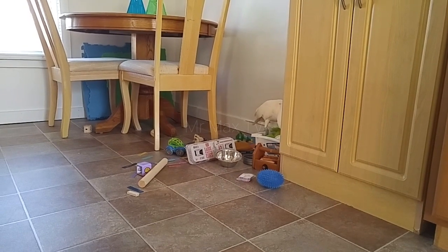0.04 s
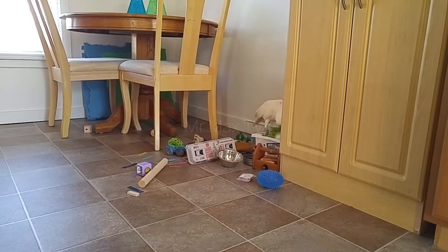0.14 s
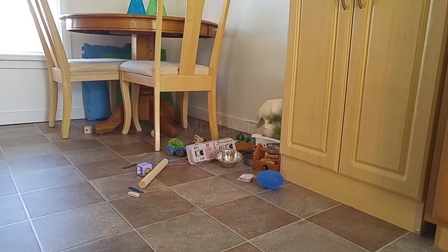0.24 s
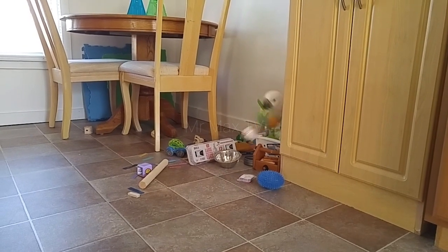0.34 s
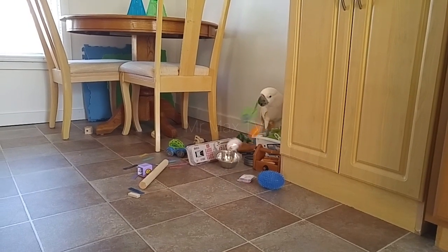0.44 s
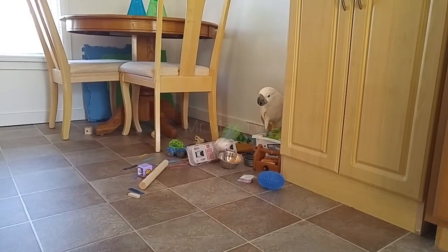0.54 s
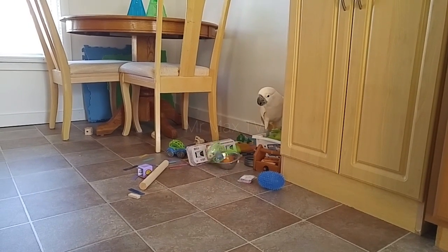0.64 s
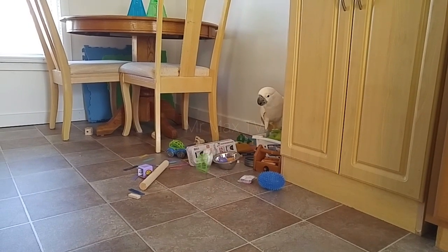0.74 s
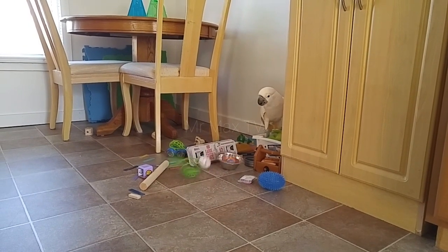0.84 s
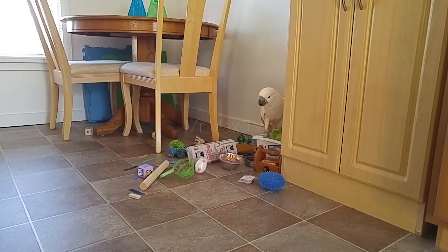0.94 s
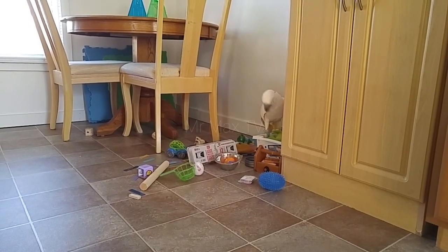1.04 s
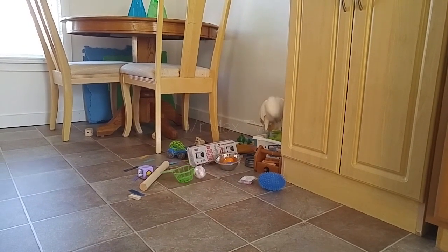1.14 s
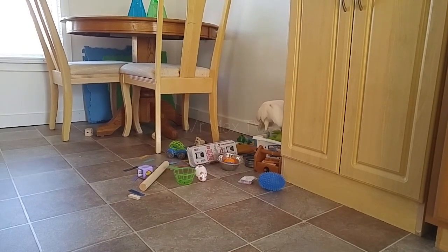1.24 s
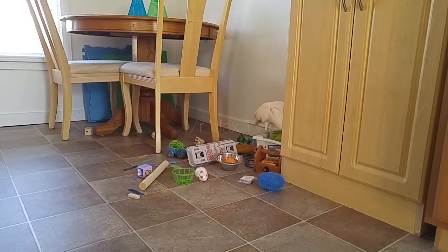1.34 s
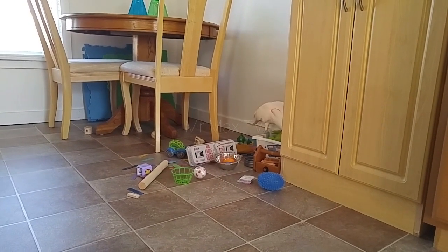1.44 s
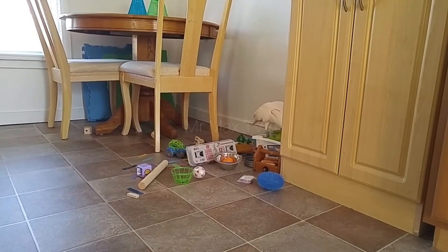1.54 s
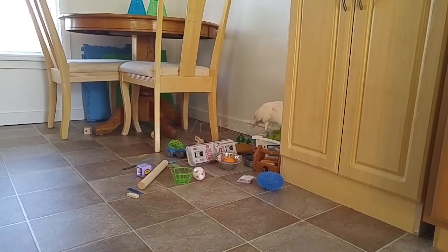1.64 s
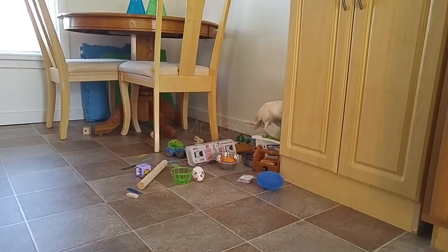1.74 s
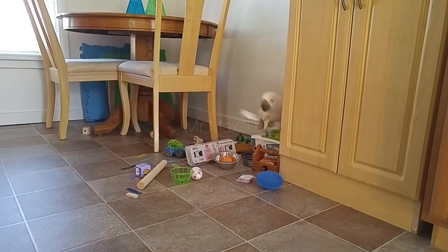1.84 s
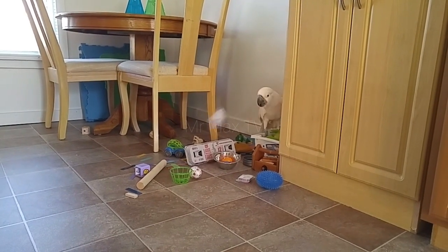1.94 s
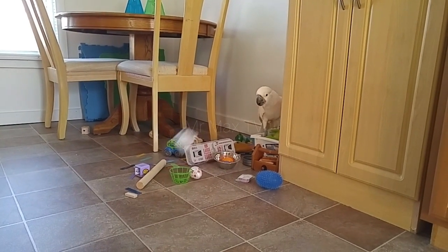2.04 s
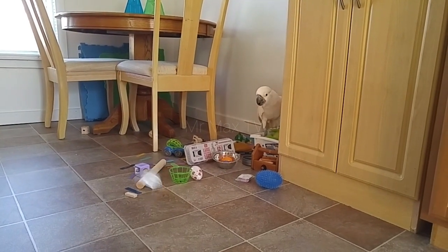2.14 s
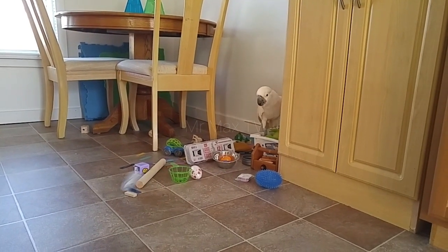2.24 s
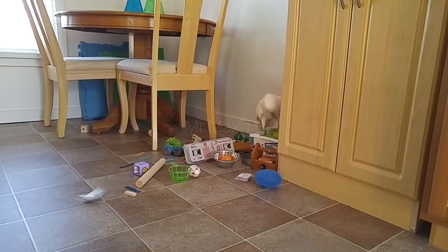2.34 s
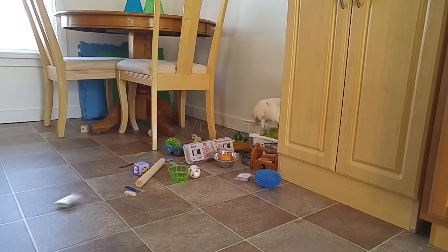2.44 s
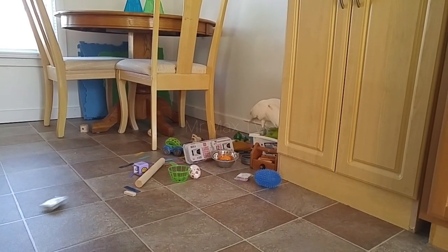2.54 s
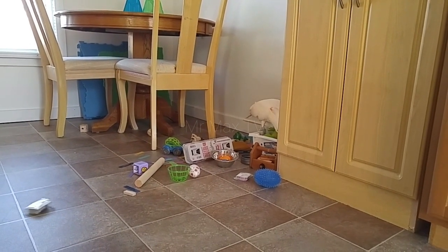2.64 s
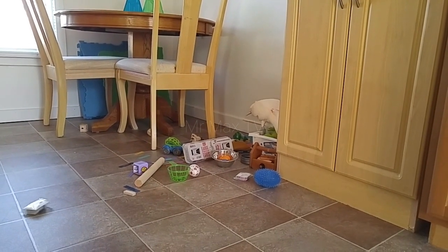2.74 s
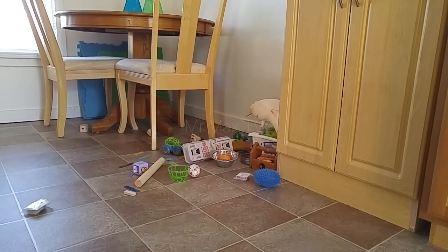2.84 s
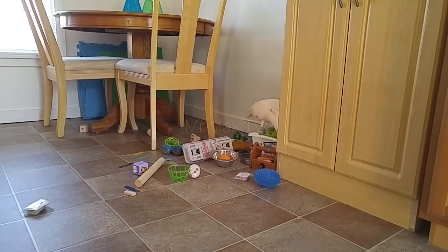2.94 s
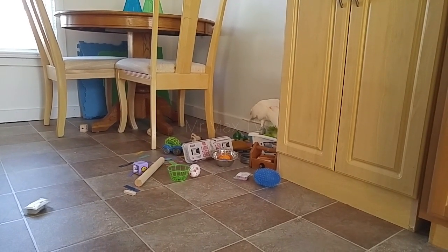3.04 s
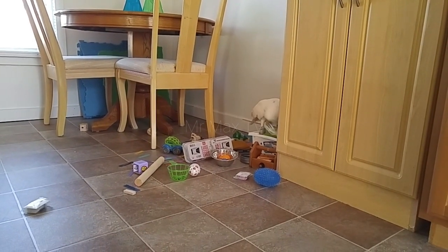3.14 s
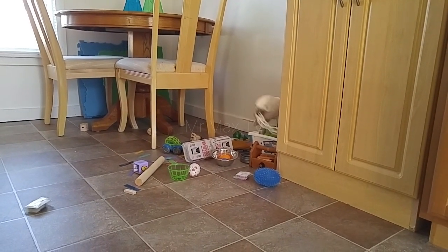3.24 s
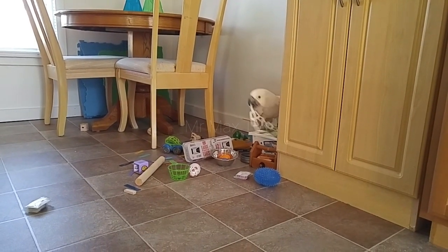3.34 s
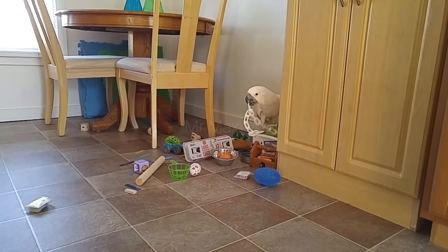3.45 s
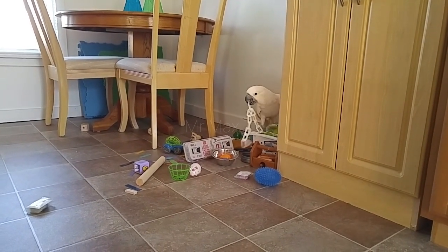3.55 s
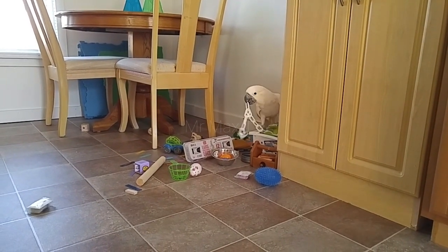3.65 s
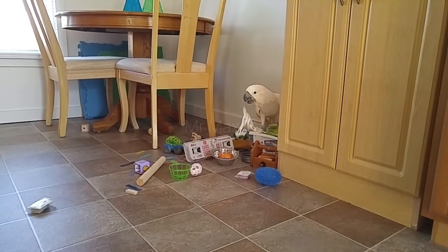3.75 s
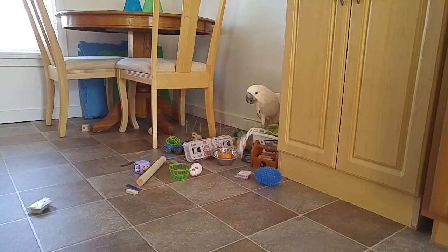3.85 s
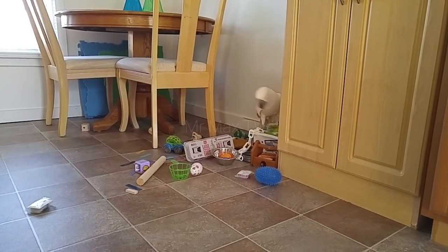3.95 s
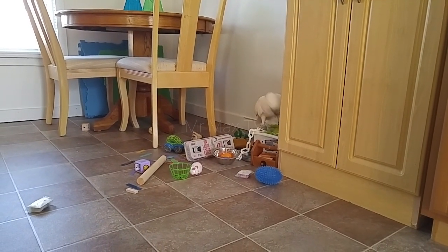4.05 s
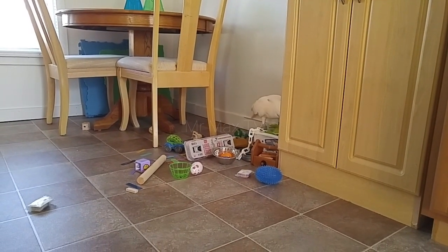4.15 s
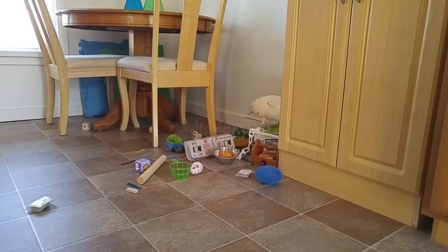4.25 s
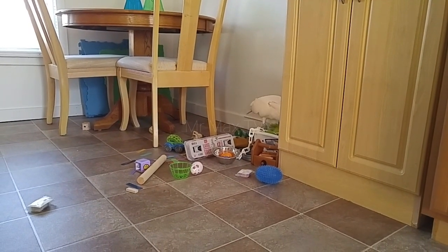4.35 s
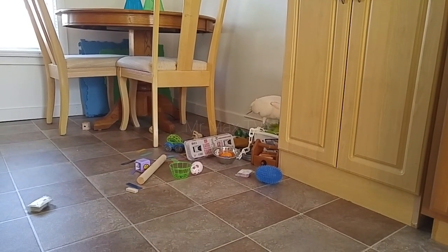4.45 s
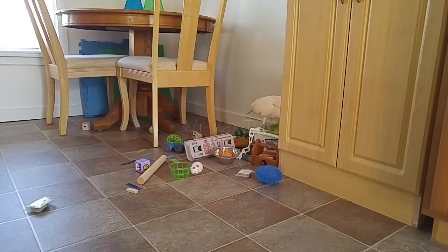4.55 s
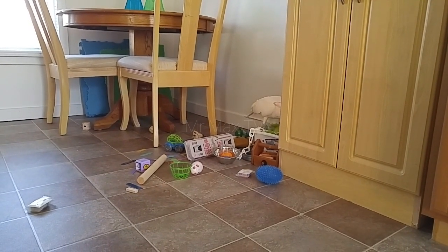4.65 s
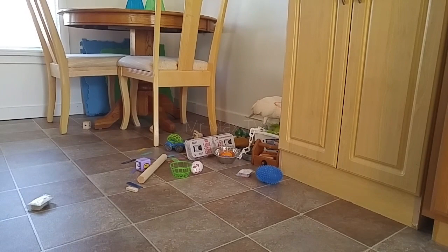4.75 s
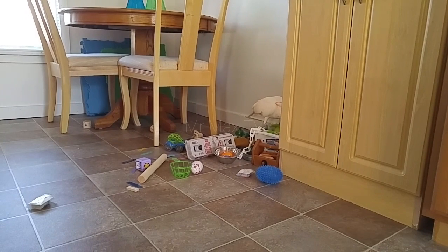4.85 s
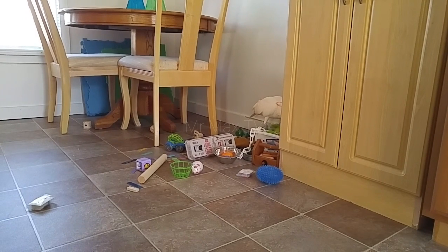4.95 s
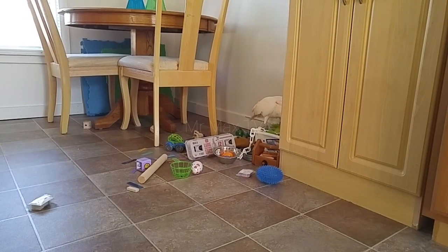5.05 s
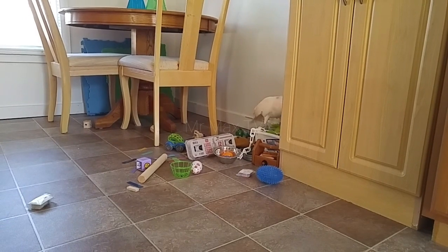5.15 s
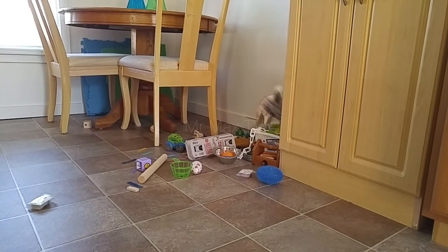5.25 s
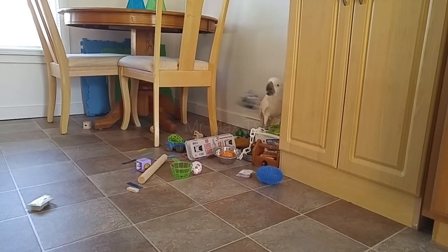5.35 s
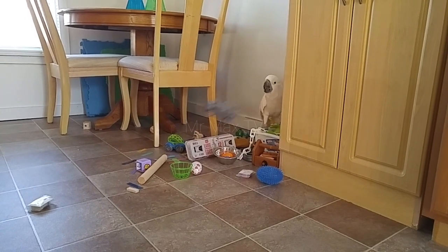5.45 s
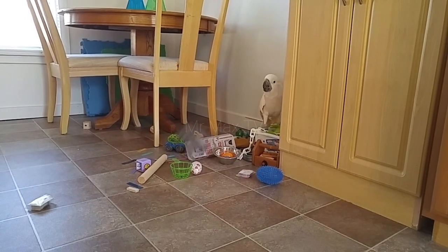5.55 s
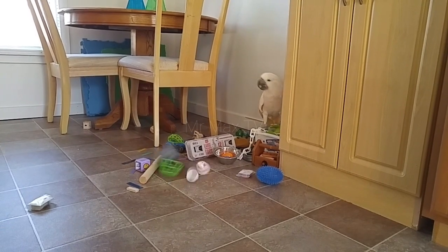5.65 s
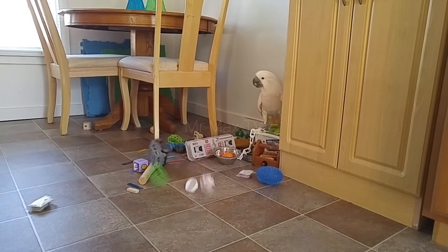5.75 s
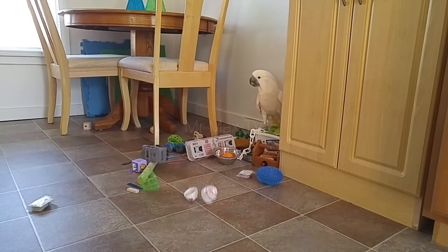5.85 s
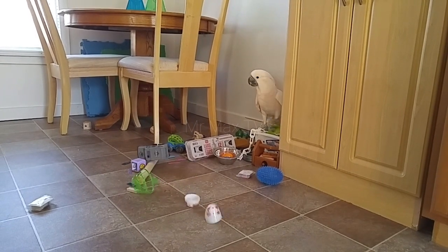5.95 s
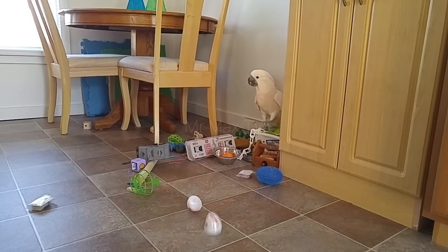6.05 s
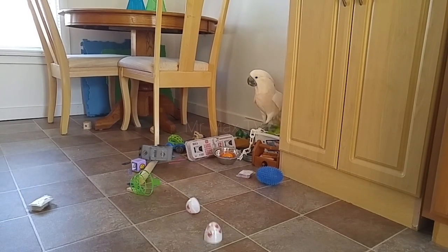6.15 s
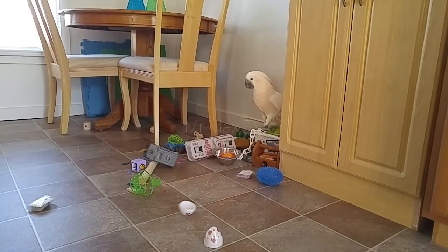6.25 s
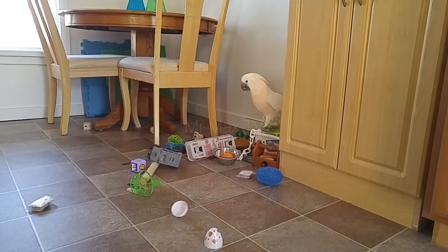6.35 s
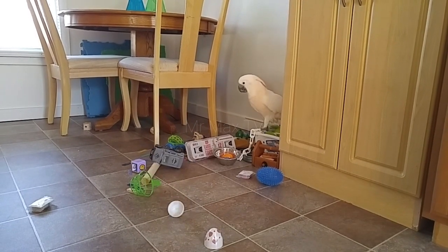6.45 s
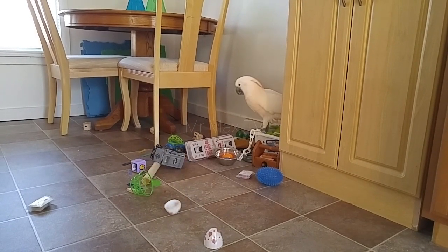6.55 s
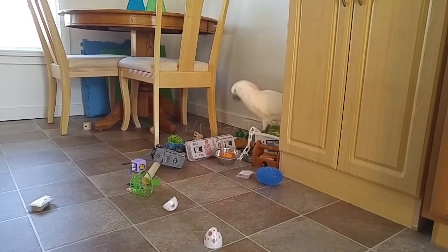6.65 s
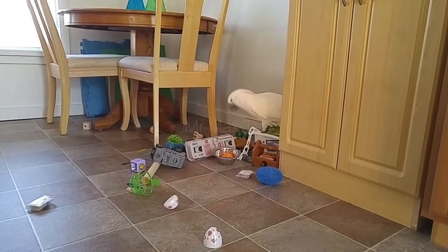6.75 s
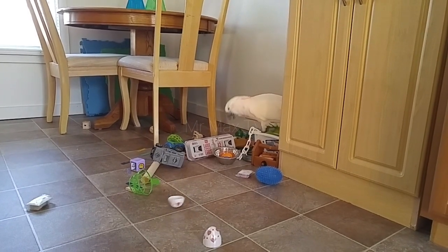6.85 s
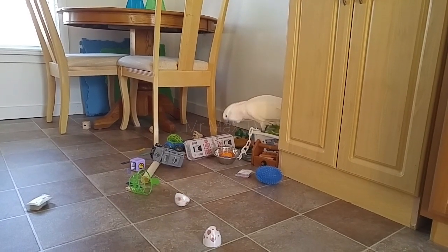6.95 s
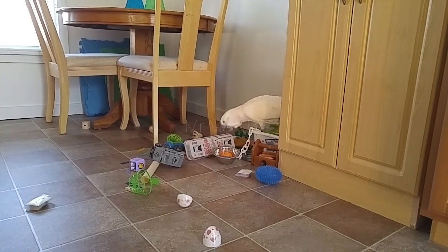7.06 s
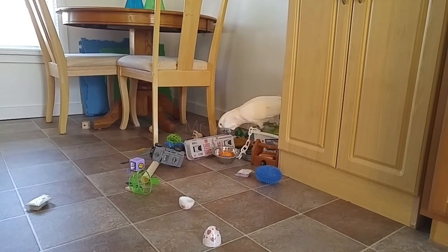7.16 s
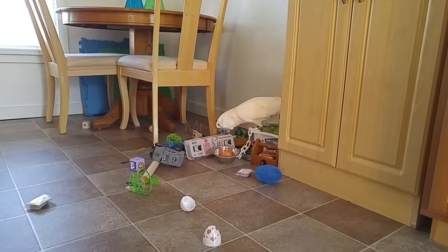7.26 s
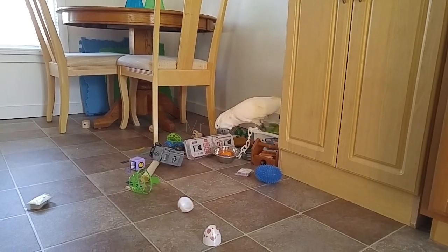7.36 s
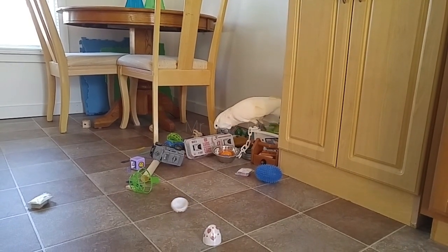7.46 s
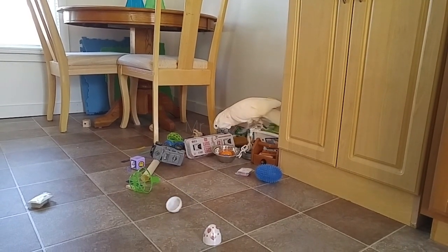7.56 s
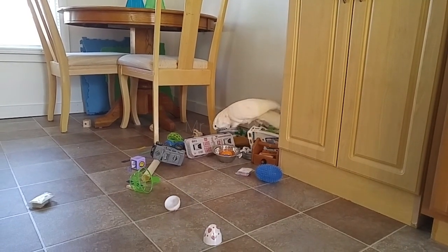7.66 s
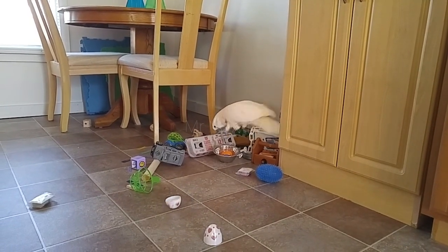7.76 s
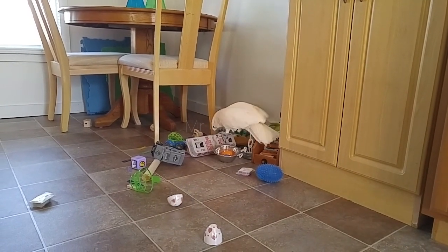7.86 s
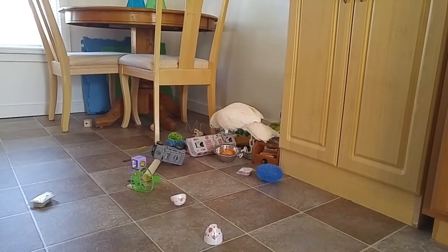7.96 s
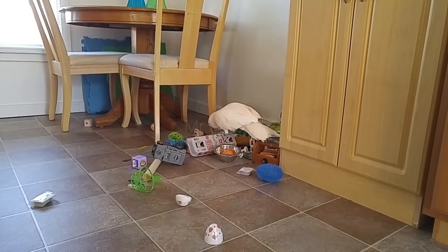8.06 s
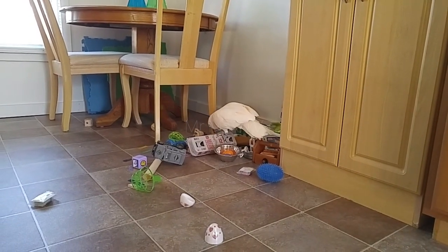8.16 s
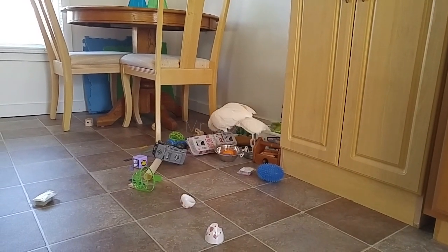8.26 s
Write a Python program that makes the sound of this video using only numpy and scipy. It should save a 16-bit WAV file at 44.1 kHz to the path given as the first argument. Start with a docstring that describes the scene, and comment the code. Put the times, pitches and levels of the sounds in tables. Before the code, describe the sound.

Plastic toys clatter, bounce and scrape on a tiled kitchen floor in bursts, with a ringing steel bowl and a jingling chain.

```python
"""Plastic toys knock, bounce and scrape on a tiled kitchen floor; a steel bowl and a chain ring out.
A pet bird is rummaging in the heap and flinging them about. Each hit makes a click and sets the
toy ringing, briefly for plastic and longer for steel. The hard room echoes and an appliance hums.
Two microphone openings, left and right, hear the bass alike and the treble differently."""
import sys
import numpy as np
from scipy import signal
from scipy.fft import rfft, irfft, next_fast_len
from scipy.io import wavfile
from scipy.ndimage import map_coordinates

SR = 44100
rng = np.random.default_rng(int(sys.argv[2]) if len(sys.argv) > 2 else 0)


def inscribe(sig):
    """Save sig as 16-bit PCM at rate SR to the path in sys.argv[1].

    A 1-D sig is mono; a 2-D sig holds one channel per row.
    Samples are clipped to [-1, 1] before scaling.
    """
    pcm = np.round(np.clip(np.atleast_2d(sig).T, -1, 1) * 32767)
    wavfile.write(sys.argv[1], SR, pcm.astype(np.int16))


N = 366030


def knocks():
    """Each hit clicks, rings the toy's hollow shell and thuds the floor. Rows: to the room, direct."""
    # t/s, click level/dB, shell f/Hz, shell over click/dB, thud over click/dB, direct path gain/dB
    hits = [(0.2248, -37, 700, 4.5, -4, -19), (0.2723, -29, 1070, -6, -13, 1),
            (0.2892, -23.5, 707, -1, -12, -4), (0.411, -23, 760, 1, -22, -14),
            (0.4324, -24, 1090, 6, -25, 4), (0.4467, -13, 2330, 4.5, -40, -5),
            (0.4693, -9.5, 1050, -27, -42, -0.5), (0.5309, -7.5, 2510, -15, -9, 3.5),
            (0.6005, -27, 854, 8, 11.5, -3), (0.6794, -10.5, 872, -16, -34, 7),
            (0.7289, -10, 2540, -11.5, -13, -14), (0.764, -21, 2250, 2, -14, -3),
            (0.8063, -26, 2170, 6, 8.5, -8), (0.8854, -22, 870, 2, -20, 2.5),
            (1.0029, -10.5, 1340, -12, -21, -1), (1.1508, -24, 1100, -5.5, -14, -12),
            (1.3425, -29.5, 1400, -24, -9, 3), (1.6175, -38, 1410, -11, -15, 0),
            (1.786, -26.5, 1420, -12, -10, -12), (1.9267, -31.5, 630, -29, -19, 10.5),
            (2.034, -36.5, 1940, -40, -21, -7), (2.226, -24.5, 654, -13, -32, -2),
            (2.2467, -10, 890, -3.5, -39, -17), (2.2548, -9.5, 683, 2.5, -28, -3),
            (2.2742, -28.5, 1390, 11, -29, 4), (2.4537, -6, 1310, -8, -44, 3),
            (2.4658, -26, 740, -2, -34, 12), (2.5681, -21.5, 1150, -1.5, -7.5, 3.5),
            (3.1212, -29.5, 750, 1.5, -13, -15), (3.1634, -20.5, 890, -5, -26, -4),
            (3.1803, -10.5, 1880, -11, -32, -3), (3.3829, -6, 765, -5, -46, -0.5),
            (3.404, -17, 1760, 2, -25, 5.5), (3.487, -22, 1950, 1, -28, 7),
            (3.5166, -15.5, 690, -5, -17, 3.5), (3.7214, -32, 738, -26, -13, -13),
            (3.8356, -20.5, 645, -9, -38, 3.5), (3.95, -2.5, 1463, -15, -48, -0.5),
            (3.966, -12.5, 1600, -2, -29.5, 9.5), (3.9832, -7.5, 602, -5, -45, -2),
            (4.406, -44, 1110, 5, 2, -14), (4.572, -40, 790, 5, -10, -11), (4.617, -32, 1100, 1, -11, -3),
            (4.7258, -41.5, 1177, 9, -1, -10.5), (4.9565, -42, 1120, 13.5, 6, -10),
            (5.0895, -41.5, 680, 8, -2, -14), (5.2281, -33, 1110, -2, -9, -8),
            (5.4004, -51, 2130, 8.5, -20, -4), (5.6649, -7.5, 1100, 3.5, -31, -1.5),
            (5.696, -0.5, 1880, -10.5, -9.5, -3), (5.713, -12, 1960, -15, -29, 4),
            (5.7784, -10.5, 1420, 2, -1, 4), (5.7988, -20, 1000, 0, -26, 10), (5.9, -29, 625, -4, 10, 1),
            (6.3286, -16, 1060, 3, -3.5, -14.5), (6.4202, -20.5, 1740, 1, -11, 0),
            (6.677, -35, 3530, -1, -30, 2), (6.6857, -25, 1940, -2.5, -10, -7),
            (6.7297, -23.5, 790, -14, -29, 2.5), (6.99, -36.5, 2090, -9, -22, 0),
            (7.196, -41, 670, 14.5, 4, 3.5), (7.257, -36.5, 640, -1, -5, -11),
            (7.432, -21, 770, -11, -26, 0.5), (7.475, -5, 1900, -17.5, -49, -1.5),
            (7.492, -13, 2000, -13.5, -35, 5.5), (7.6153, -22.5, 2140, -3, -11, -5),
            (7.723, -19, 730, -10, -18, -2)]
    # a shell's tones: ratio to its pitch, level/dB
    shell_tones = [(.62, -10), (1, 4.5), (1.45, -2), (2.1, -15)]
    # the colour of hard plastic on tile: f/Hz, level/dB
    click_colour = [(1180, -13.5), (2000, -4.5), (3460, -10.5), (4090, -9.5), (5470, -12), (6360, -6),
                    (8820, -4), (10100, -12), (14700, -23.5), (16100, -36), (16500, -50)]
    clicks, bodies, t = np.zeros((2, N)), np.zeros((2, N)), np.arange(SR // 10) / SR
    for s, db, hz, shell_db, thud_db, near_db in hits:
        click = amp(db - 60 * t / 0.015) * rng.choice([-1, 1], len(t)) * (1 - np.exp(-t / 0.00058))
        # higher tones die sooner
        shell = sum(amp(level_db - 60 * t * ratio / 0.018) * np.sin(2 * np.pi * hz * ratio * t)
                    for ratio, level_db in shell_tones)
        shell *= 1 - np.exp(-t / 0.00036)
        thud = sum(np.sin(2 * np.pi * low_hz * rng.uniform(6 / 7, 7 / 6) * t)
                   for low_hz in (140, 260, 400))
        thud *= amp(-60 * t / 0.048) * (1 - np.exp(-t / 0.005))
        body = amp(db + shell_db) * shell + amp(db + thud_db) * thud
        for path, gain in enumerate([1, amp(near_db)]):
            add(clicks[path], s, gain * click)
            add(bodies[path], s, gain * body)
    return coloured(clicks, click_colour) + bodies


def rummage():
    """Each shove swells and fades as the toys scrape, rattle their shells and rumble on the tiles."""
    # peak t/s, rustle level/dB, 20 dB swell/s, 20 dB fade/s, rattle and rumble over rustle/dB
    shoves = [(.3, -47, 0.14, 0.18, 6.5, -10), (0.479, -22.5, 0.11, 0.083, -1.5, -17),
              (.6, -36, .1, 0.34, 7, 6.5), (.69, -27, 0.047, .06, -2, 1.5),
              (.74, -21.5, 0.06, 0.1, -1, -2.5), (.89, -38, 0.48, 0.32, 6, -3.5),
              (1.02, -30, .08, 0.07, -7.5, -8.5), (1.23, -41.5, 0.23, 0.075, -4.5, -21),
              (1.42, -51, 0.5, 0.22, -0.5, -2.5), (1.64, -44.5, 0.018, 0.22, -5.5, -11),
              (1.83, -39.5, 0.11, 0.072, -5, -8), (1.94, -45.5, 0.27, 0.038, -11, -19),
              (2.26, -47.5, 0.044, 0.072, -3, -20), (2.33, -47, 0.087, 0.068, 5, 5.5),
              (2.468, -39.5, 0.022, 0.089, 11, -17), (2.589, -48, 0.19, 0.15, 1.5, -0.5),
              (3.07, -49.5, 0.37, 0.25, 2, -10), (3.19, -35.5, 0.069, 0.55, -5.5, -13),
              (3.33, -47, 0.22, .1, -6, -3), (3.393, -35, 0.029, 0.11, 13.5, -21),
              (3.49, -29.5, .07, 0.14, -2, -11), (3.88, -34.5, 0.12, 0.21, -0.5, -28),
              (3.969, -26.5, 0.028, 0.1, -2, -7), (4.09, -33.5, 0.091, 0.1, -3.5, -10),
              (4.62, -55.5, 0.15, 0.24, 5, 8.5), (4.74, -61, .04, 0.18, 10.5, 13.5),
              (4.97, -62.5, 0.043, 0.12, 13.5, 7), (5.1, -59, 0.037, 0.15, 17, 4),
              (5.25, -52.5, 0.14, 0.1, 5, 1), (5.708, -26, 0.023, 0.092, 3, -3),
              (5.8, -34.5, 0.086, 0.13, 5, 9.5), (5.89, -37, 0.086, 0.15, 6.5, -16),
              (6.059, -47, 0.12, 0.046, 15, -12), (6.17, -51, 0.052, 0.09, 19, -14),
              (6.332, -40, 0.055, 0.19, 9.5, -21), (6.45, -47.5, 0.19, 0.047, 4, 7),
              (6.7, -41, 0.027, 0.16, 0.5, -9), (6.82, -46.5, 0.18, 0.05, -1, -10),
              (7.01, -63, 0.074, .24, 4, -12), (7.21, -61.5, 0.071, 0.56, 12, 16),
              (7.488, -31.5, 0.055, 0.083, 0.5, -16), (7.63, -40, .03, 0.35, 1.5, -8),
              (7.871, -42.5, 0.078, 0.087, 14, 9)]
    # the heap never lies quite still: level/dB of rustle, rattle, rumble
    stir_db = (-72.5, -69, -59.5)
    # the colours of scraping, rattling and rumbling toys: f/Hz, level/dB
    rustle_colour = [(1180, -22), (2000, -13), (2580, -4.5), (3740, -1.5), (5010, -5.5), (6140, -2),
                     (9460, 0.5), (10700, -10), (14700, -14), (16100, -35), (16500, -42)]
    rattle_colour = [(240, -10), (400, -7), (525, -4.5), (715, 8.5), (1680, 0), (1820, 1.5), (2480, -4.5),
                     (3500, -11), (4550, -21), (7700, -120)]
    rumble_colour = [(41, -47), (70, -16), (125, -11.5), (214, -6.5), (423, 0), (469, -15.5), (650, -4.5),
                     (840, -16.5), (1430, -120)]
    t = np.arange(N) / SR
    power = np.ones((3, N)) * amp(stir_db)[:, None] ** 2
    for s, db, swell_s, fade_s, rattle_db, rumble_db in shoves:
        shape_db = db - 20 * np.where(t < s, (s - t) / swell_s, (t - s) / fade_s)
        power += amp([[0], [rattle_db], [rumble_db]]) ** 2 * amp(shape_db) ** 2
    rustle = coloured(ticks(1800, spread_db=5.0), rustle_colour)
    rattle = coloured(ticks(700, spread_db=4.0), rattle_colour)
    rumble = coloured(ticks(250, spread_db=5.5), rumble_colour)
    return np.sum(np.sqrt(power) * [rustle, rattle, rumble], axis=0)


def plastic_cups():
    """Thin cups and toy egg halves rock and bounce: the rim taps and the hollow inside rings."""
    # t/s, level/dB, f/Hz of the hollow, tap over ring/dB
    bounces = [(4.637, -24.5, 1095, -18), (4.669, -28, 1030, -22), (4.974, -24.5, 1084, -31),
               (5.019, -31.5, 1050, -23), (5.869, -10.5, 1006, -9), (6.021, -9, 1517, -14),
               (6.047, -8.5, 1456, -7), (6.056, -9.5, 1256, -32), (6.078, -19, 1400, -21),
               (6.17, -9.5, 1330, -13.5), (6.174, -9.5, 1084, -17), (6.189, -9.5, 830, -18.5),
               (6.237, -9.5, 1010, -18), (6.259, -12.5, 900, -28), (6.277, -15, 1160, -12),
               (6.297, -14.5, 1070, -16), (6.328, -10, 990, -12), (6.331, -13, 1040, -18),
               (6.366, -16.5, 1575, -18), (6.4, -18, 974, -25), (6.418, -31, 1740, -4),
               (7.784, -20.5, 710, -28), (7.809, -21.5, 704, -16), (7.834, -21, 715, -26),
               (7.853, -4, 714, -23), (7.861, -18.5, 690, -6), (7.886, -14, 790, -24),
               (7.898, -12, 693, -16.5), (7.916, -22, 780, -25), (7.929, -25, 740, -24),
               (7.949, -25.5, 736, -29), (7.972, -31, 724, -28), (7.992, -28, 700, -30),
               (8.02, -33, 710, -29)]
    # the colour of a thin rim on tile: f/Hz, level/dB
    tap_colour = [(1200, -5), (2000, 7), (3000, -17), (5500, -13), (7000, -4.5), (8800, -3), (10500, -15.5),
                  (13000, -30), (16500, -47)]
    rings, taps, t = np.zeros(N), np.zeros(N), np.arange(SR // 10) / SR
    for s, db, hz, tap_db in bounces:
        tone = amp(-60 * t / 0.023) * np.sin(2 * np.pi * hz * t)
        overtone = 0.18 * amp(-60 * t / 0.037) * np.sin(2 * np.pi * 1.3 * hz * t)
        add(rings, s, amp(db) * (tone + overtone) * (1 - np.exp(-t / 0.00066)))
        add(taps, s, amp(db + tap_db - 60 * t / 0.016) * rng.choice([-1, 1], len(t)))
    return cut_bass(rings, below_hz=350) + coloured(taps, tap_colour)  # the cups' ringing stays out of the bass


def steel_bowl():
    """A struck bowl rings until its rim leans on the heap, which stops the rim's tones."""
    # the bowl's tones: f/Hz
    pitches = [428, 857, 1421, 1868, 2190, 2269, 2556, 3913, 4721, 7407, 8635, 8904, 9302]
    # for each tone: level/dB, time to fade 60 dB/s, place (near 1 the rim, near -1 the base)
    tones = [(-4, 0.52, -0.33), (-1, 0.8, 0.53), (-13.5, 2.16, 0.47), (-22, 1.1, 0), (-0.5, 0.64, -1.2),
             (-5, 0.35, -1.7), (-0.5, 0.93, 1), (-12, 0.33, 1), (-17, 0.82, -1.1), (-8.5, 0.58, 0),
             (-15, .4, 0), (-11, 0.64, -0.96), (-23, 0.39, -0.74)]
    # t/s, level/dB, boost of the rim's tones/dB
    blows = [(.45, -34, 1), (0.53, -24.5, 1), (0.601, -28, 5), (0.68, -20.5, -0.5), (0.731, -27.5, 1.5),
             (0.807, -32, -8), (0.885, -36.5, 7.5), (1.004, -40, 0)]
    return struck_steel(pitches, tones, blows, rest_s=1.0, stop_above_place=0.7)


def chain():
    """Steel links jingle until they settle on the heap, which stops all their tones."""
    # the links' tones: f/Hz
    pitches = [1852, 1891, 3387, 4102, 7353, 7601, 7886, 7955, 8801, 9667, 11020, 11750, 13250]
    # for each tone: level/dB, time to fade 60 dB/s, place (near 1 large links, near -1 small)
    tones = [(-15, 0.99, 0.92), (-15, 0.72, 1), (-10.5, 0.81, 0.88), (-11, 0.57, 0.84), (7, 0.28, -0.71),
             (-5, .4, -1), (-4.5, 0.37, -1.1), (-4, 0.78, -1), (-0.5, 0.38, 1), (-3, 0.26, 0.9),
             (-11.5, 0.23, -1), (-22, 0.17, -1), (-12, 0.25, -1)]
    # t/s, level/dB, boost of the large links/dB
    blows = [(3.948, -30.5, -5), (3.985, -22.5, 3.5), (4.07, -30.5, 1), (4.151, -45, 0)]
    return struck_steel(pitches, tones, blows, rest_s=4.16, stop_above_place=-np.inf)


def struck_steel(pitches, tones, blows, rest_s, stop_above_place):
    """Each blow feeds the tones according to where it lands; rocking makes them waver."""
    out, t, first_s = np.zeros(N), np.arange(2 * SR) / SR, blows[0][0]
    settling = amp(-150 * np.clip(t + first_s - rest_s, 0, None))
    for hz, (level_db, fade_s, place) in zip(pitches, tones):
        energy = np.zeros(len(t))
        for s, db, boost_db in blows:
            blow_db = db + level_db + place * boost_db + rng.normal(0, 1.5)
            add(energy, s - first_s, amp(blow_db - 60 * t / fade_s) ** 2)
        loudness = np.sqrt(energy) * amp(4.4 * wobble(34.6, len(t)))
        tone = np.sin(2 * np.pi * hz * t + 1.55 * wobble(29.44, len(t)))
        add(out, first_s, loudness * tone * (settling if place > stop_above_place else 1))
    return out


def kitchen_echo(x):
    """Tiles and cupboards reflect the sound; the toys keep moving, so each moment has its own echo."""
    # how long the room rings: f/Hz, time to fade 60 dB/s
    fade_times = [(150, 0.26), (1400, 0.3), (5000, 0.35), (12000, 0.25)]
    block, delay = 4096, 100  # samples
    out = np.zeros((2, N + SR))
    for start in range(0, N, block):
        hz, t, noise = signal.stft(rng.standard_normal((2, SR // 3)), SR, nperseg=256)
        dying = amp(-60 * t / along(fade_times, hz)[:, None])
        near_corner = 1 + 0.41 * np.exp(-t / 0.013)  # answers strongly at first
        tail = signal.istft(noise * dying * near_corner, SR, nperseg=256)[1]
        tail /= np.linalg.norm(tail[0])
        echo = signal.fftconvolve(x[None, start:start + block], tail, axes=1)
        out[:, start + delay:][:, :echo.shape[1]] += echo
    return out[:, :N]


def background():
    """Room noise drifts in level under a slightly unsteady motor hum. Returns mid and side."""
    # the colour of the room noise: f/Hz, level/dB
    air_colour = [(15, -36), (25, -21), (48, -4), (70, 4), (87, -12.5), (124, 7.5), (146, -23), (167, -6),
                  (378, -0.5), (524, -15), (617, -3.5), (1320, -17.5), (1930, -27), (14800, -41),
                  (16500, -39)]
    # its rise and fall: t/s, level/dB
    air_levels = [(0.0, -52.5), (0.48, -49), (0.71, -49), (1.11, -54), (1.96, -57), (3.51, -49.5),
                  (4.16, -52.5), (5.71, -50), (5.8, -41.5), (6.96, -58.5), (7.65, -49), (8.3, -45.5)]
    # the appliance's hum and whine: f/Hz, level/dB
    motor_tones = [(59.2, -55.5), (120, -69), (180, -64), (241, -58), (360, -61), (388, -82), (628, -61.5),
                   (8300, -70)]
    t = np.arange(N) / SR
    air_db = np.interp(t, *np.transpose(air_levels)) + wobble(2.6)
    air = amp(air_db) * coloured(rng.standard_normal((2, N)), air_colour)
    hum = sum(amp(db + 1.2 * wobble(6)) * np.sin(2 * np.pi * hz * t + 0.8 * wobble(3.29))
              for hz, db in motor_tones)
    return air[0] + hum, air[1]


def microphones(mid, side):
    """Left and right from what both openings share (mid) and what differs (side, little in the bass)."""
    # stereo width: f/Hz, gain of the side/dB
    width = [(60, -30), (110, -24), (200, -14), (380, -11), (700, -6), (1290, 0), (2380, -1), (4400, 0.5),
             (8120, 0), (15000, -0.5)]
    # balance: f/Hz, left over right/dB
    balance = [(60, 1), (110, -1), (200, 0), (380, -0.5), (700, 0), (1290, -5.5), (2380, -5), (4400, 2),
               (8120, 0.0), (15000, -0.5)]
    side = filtered(side, lambda hz: amp(along(width, hz)))
    left_right = np.array([mid + side, mid - side])
    return filtered(left_right, lambda hz: amp(along(balance, hz) * [[0.5], [-0.5]]))


def amp(db):
    """Turn decibels into a gain."""
    return 10 ** (np.asarray(db) / 20)


def along(points, hz):
    """Read between (f/Hz, value) points on a log frequency scale."""
    f, values = np.transpose(points)
    return np.interp(np.log(hz + 1), np.log(f + 1), values)


def wobble(rate, size=N):
    """A smooth curve through `rate` random values a second."""
    values = rng.standard_normal(int(size * rate / SR) + 4)
    return map_coordinates(values, [np.arange(size) * rate / SR], order=3)


def ticks(rate, spread_db):
    """Tiny uneven contacts in random clumps, roughly `rate` a second, scaled to power 1."""
    hit = rng.random(N) < rate / SR * amp(3 * wobble(30))
    contacts = hit * rng.choice([-1, 1], N) * amp(spread_db * rng.standard_normal(N))
    return contacts / np.sqrt(np.mean(contacts ** 2) + 1e-20)


def filtered(x, response):
    """Scale each frequency in x by response(hz)."""
    size = next_fast_len(N + SR // 2)
    return irfft(rfft(x, size) * response(np.fft.rfftfreq(size, 1 / SR)), size)[..., :N]


def cut_bass(x, below_hz):
    """Turn down the low frequencies."""
    return filtered(x, lambda hz: hz ** 4 / (hz ** 4 + below_hz ** 4))


def coloured(x, colour):
    """Give noise a colour (its mix of low and high), at about the same power."""
    gain = amp(along(colour, np.linspace(0, SR / 2, 2000)))
    return filtered(x, lambda hz: amp(along(colour, hz))) / np.sqrt(np.mean(gain ** 2))


def add(track, s, sound):
    """Lay a sound into a track at s seconds."""
    part = track[round(s * SR):][:len(sound)]
    part += sound[:len(part)]


def scene():
    """The toys, heard directly and through the room, over the background."""
    to_room, direct = knocks() + rummage()
    cups = plastic_cups()
    steel = steel_bowl() + chain()
    echo_mid, echo_side = amp(0.5) * kitchen_echo(to_room + amp(-2.5) * cups + steel / 4)
    mid = amp(-4.5) * direct + cups + steel + echo_mid
    mid = cut_bass(mid, below_hz=75)  # small microphones lose the deepest bass
    side = amp(-35.5) * direct + 0.16 * cups + 0.17 * steel + amp(1) * echo_side
    air_mid, air_side = background()
    return microphones(mid + air_mid, side + air_side)


def record(dry):
    """Round off loud peaks and remove the very highest treble."""
    ceiling, top_hz = 0.95, 16300
    soft = dry / (1 + np.abs(dry / ceiling) ** 6) ** (1 / 6)
    return filtered(soft, lambda hz: hz < top_hz)


dry = scene()
out = record(dry)
inscribe(out)
```